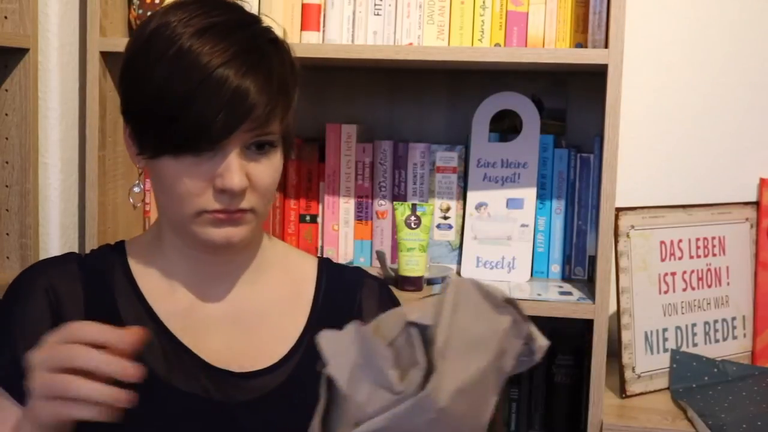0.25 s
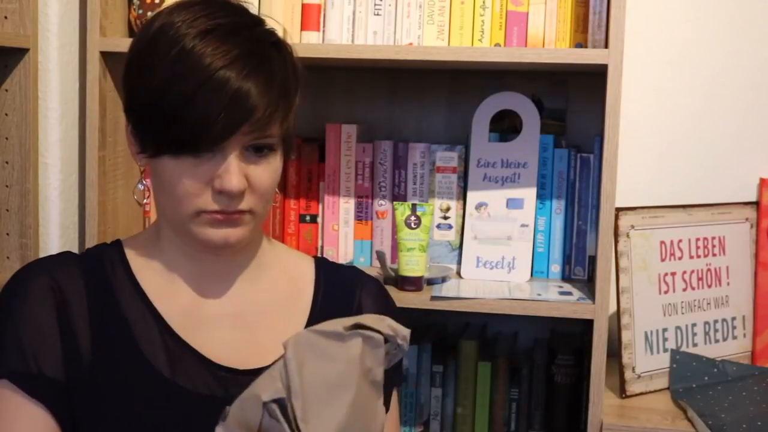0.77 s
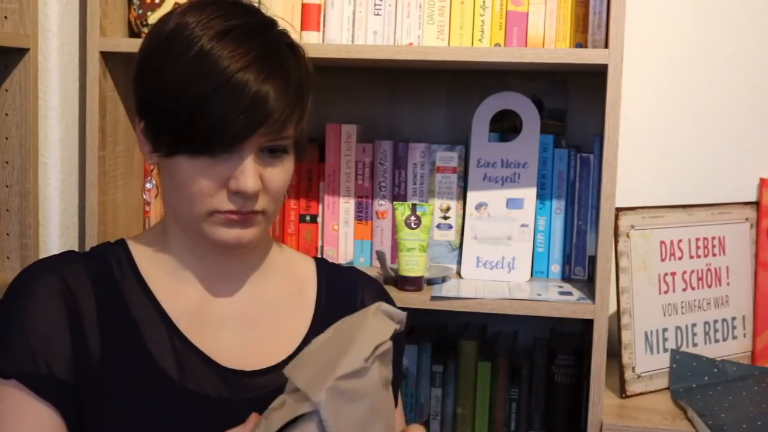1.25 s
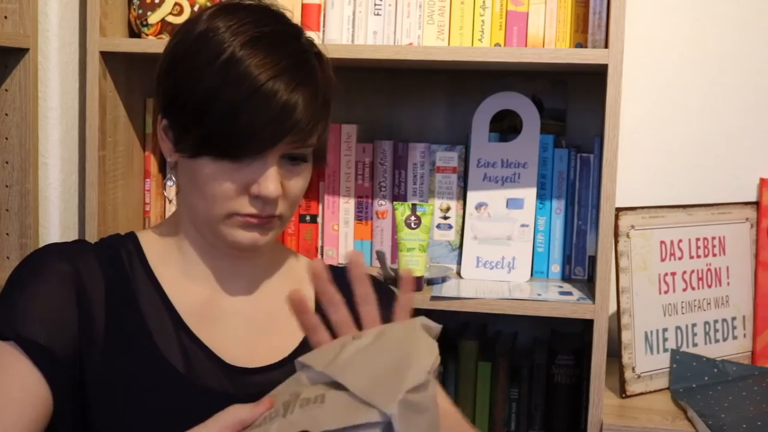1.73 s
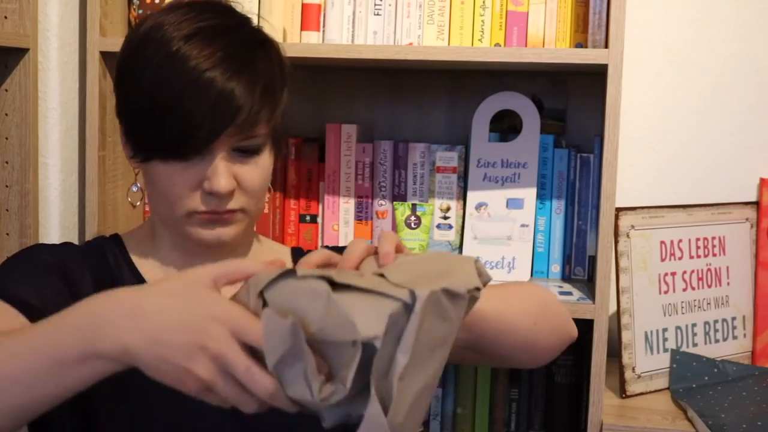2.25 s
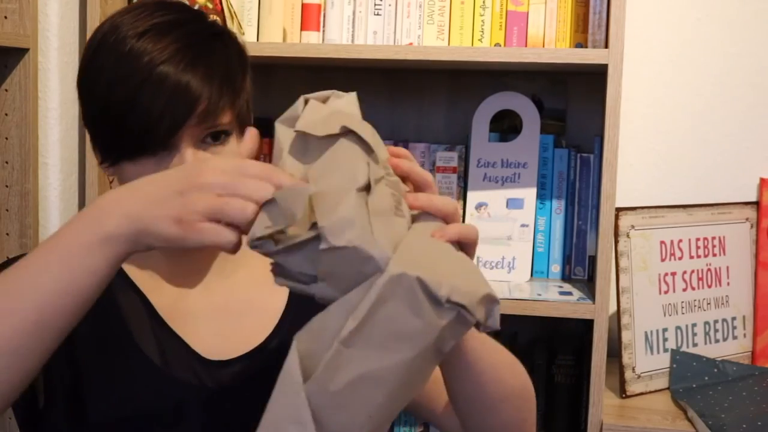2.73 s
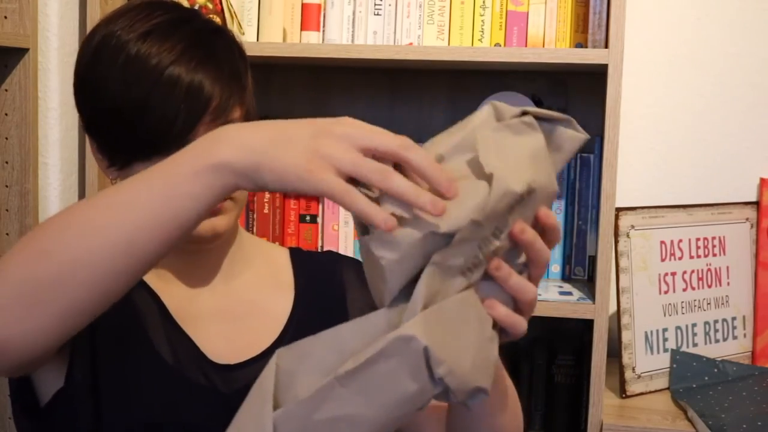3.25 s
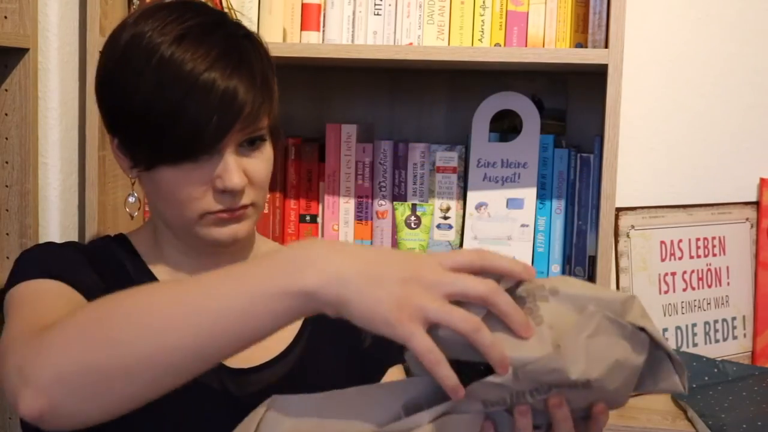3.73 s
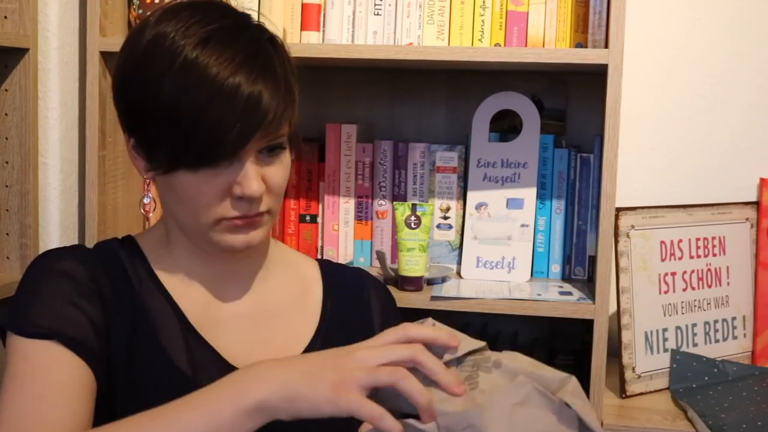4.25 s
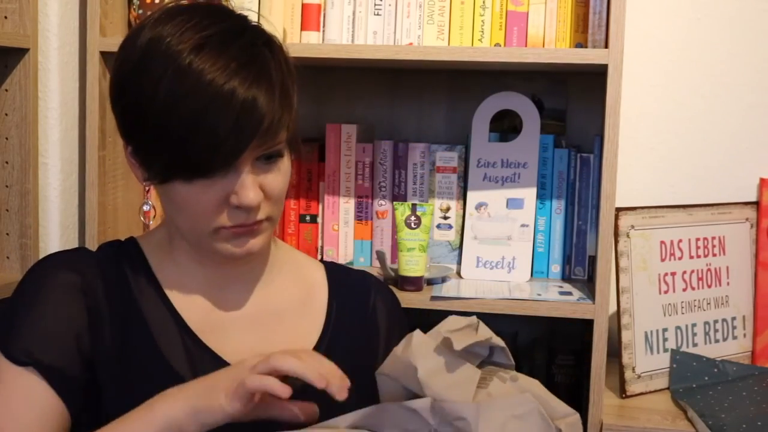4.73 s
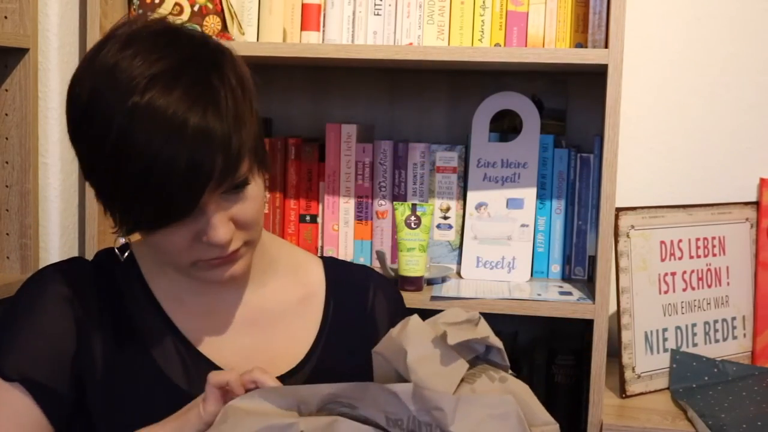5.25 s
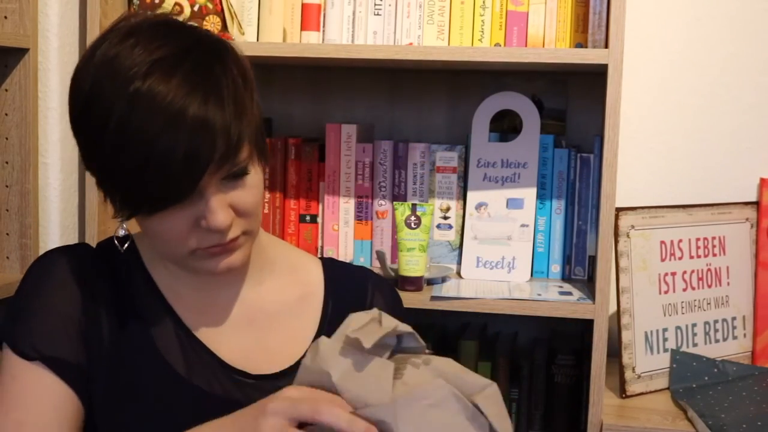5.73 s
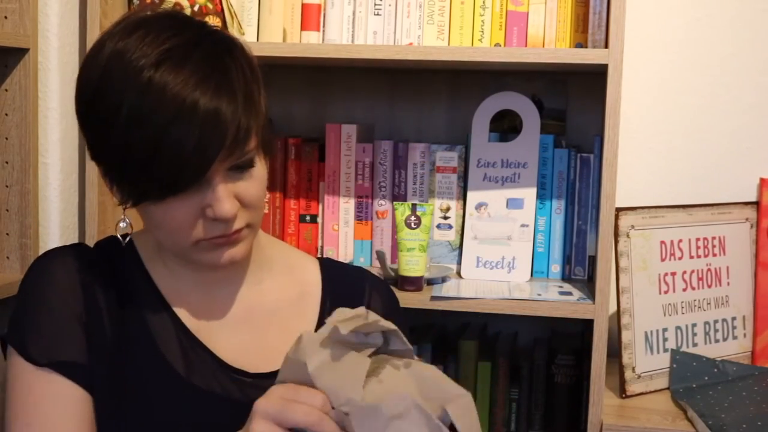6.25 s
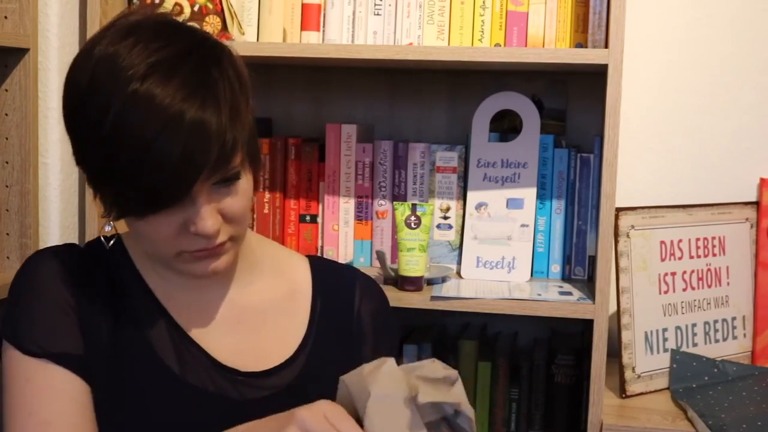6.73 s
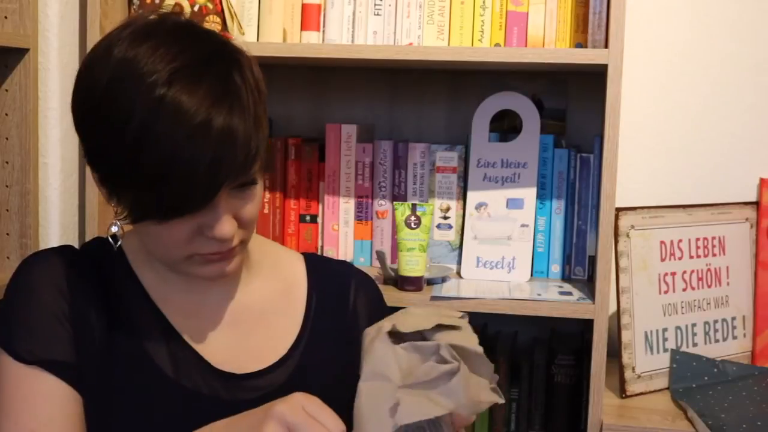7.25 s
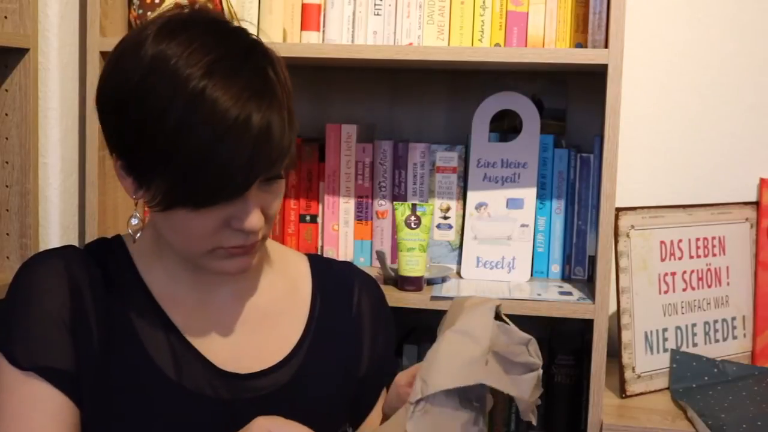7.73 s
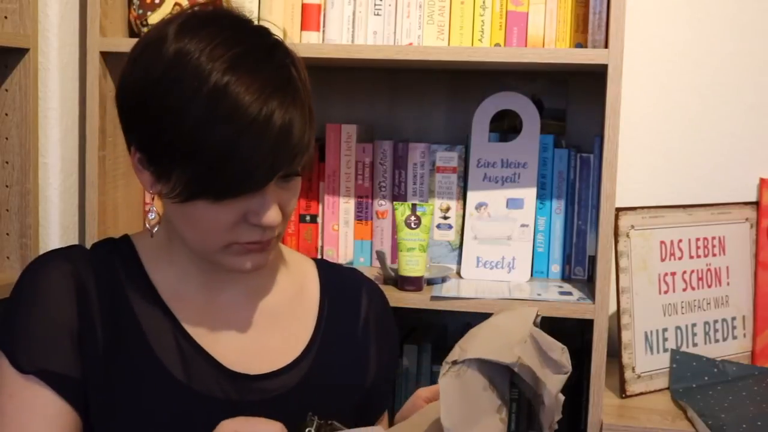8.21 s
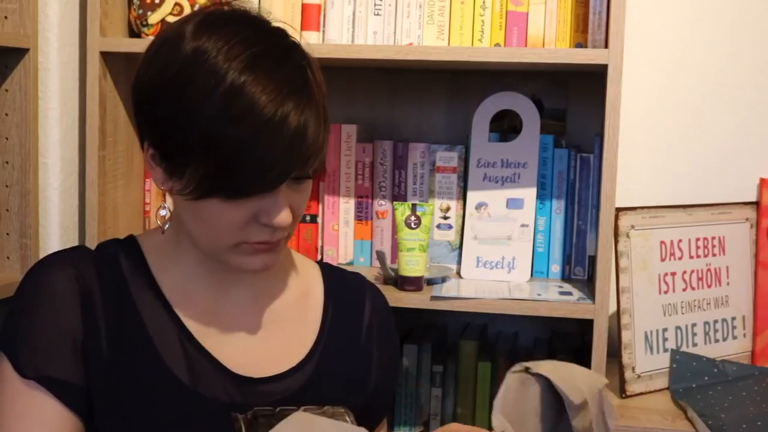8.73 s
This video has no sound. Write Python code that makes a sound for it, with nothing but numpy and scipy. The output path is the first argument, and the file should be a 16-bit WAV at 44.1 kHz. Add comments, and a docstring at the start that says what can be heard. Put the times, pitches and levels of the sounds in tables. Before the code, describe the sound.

Hands turn and unwrap a bundle of stiff packing paper close to a stereo microphone. A sharp crackle opens, then the paper rustles in short, uneven bursts with brief lulls between them. Creases snap one by one or in clusters, large folds give way with soft hollow knocks, and the sheets rub faintly. The small furnished room adds a short echo and a quiet hush.

```python
"""A small furnished room: hands turn and unwrap a bundle of stiff packing paper near a stereo microphone.
Thousands of small facets buckle as a rustle, creases snap over one by one, and the hollow wad knocks as
large folds give way. Narrow tones come from paper rubbing and from the lingering ring of the knocks.
A shelf close behind throws early echoes; the room adds a short tail and a quiet hush."""
import sys
import numpy as np
from scipy import signal
from scipy.fft import rfft, irfft
from scipy.io import wavfile

SR = 44100
rng = np.random.default_rng(int(sys.argv[2]) if len(sys.argv) > 2 else 0)


def wav_record(signal):
    """Record a signal, one row per channel, as 16-bit PCM in the file named by sys.argv[1]."""
    frames = np.transpose(np.atleast_2d(signal))
    bounded = np.clip(frames, -1, 1)
    # unit amplitude maps onto the largest positive 16-bit level
    quanta = np.round(bounded * 32767).astype(np.int16)
    wavfile.write(sys.argv[1], SR, quanta)


N = 395572


def from_db(db):
    """Decibels to gain."""
    return 10 ** (np.asarray(db) / 20)


def unit_rms(x):
    """Scale to rms 1."""
    return x / np.sqrt(np.mean(x ** 2) + 1e-20)


def unit_peak(x):
    """Scale to peak 1."""
    return x / np.abs(x).max()


def at_hz(curve, hz):
    """Interpolate a table over log frequency."""
    freqs_hz, values = np.array(curve).T
    return np.interp(np.log(hz), np.log(freqs_hz), values)


def drift(rate_hz):
    """Random knots joined by lines, spread 1."""
    knots = rng.standard_normal(4000)
    return np.interp(np.arange(N) * rate_hz / SR, np.arange(len(knots)), knots) * np.sqrt(3 / 2)


def butter(x, hz, kind, order=2):
    """Butterworth filter."""
    return signal.sosfilt(signal.butter(order, hz, kind, fs=SR, output="sos"), x)


def narrow(x, hz, width):
    """Band-pass within a factor 1 + width of hz."""
    return butter(x, [hz / (1 + width), min(hz * (1 + width), 0.45 * SR)], "band")


def ring(force, hz, t60_s):
    """One damped mode."""
    radius, angle = from_db(-60 / (t60_s * SR)), 2 * np.pi * hz / SR
    return signal.lfilter([0, np.sin(angle)], [1, -2 * radius * np.cos(angle), radius ** 2], force + 1e-18)


def facet(force, hz, cycles, width):
    """A paper facet rings for a few cycles in a band around its pitch."""
    return narrow(ring(force, hz, cycles / hz), hz, width)


def pan_gains(pan_db):
    """Left and right gains; positive is left."""
    return from_db([pan_db / 2, -pan_db / 2])


def placed(x, spot, pan_db, lag_per_spot_s=0.00007):
    """A source to one side is louder and earlier at the near microphone port."""
    lag = round(spot * lag_per_spot_s * SR)
    return pan_gains(pan_db)[:, None] * [np.roll(x, max(-lag, 0)), np.roll(x, max(lag, 0))]


# Hand squeezes: start_s, swell_s, hold_s, middle_db, large_re_middle_db, small_re_middle_db,
# lean_db_per_octave
SQUEEZES = [(-.1, 0.041, 0.04, -21.5, 1, -9, -4), (0.189, 0.0063, 0.028, -75, -10, 1, 4.5),
            (0.269, .01, 0.045, -79.5, 4, -16.5, -7), (0.37, 0.018, .04, -75.5, -3, -5, -5),
            (0.455, 0.027, 0.098, -41.5, -22, -3.5, 3.5), (0.552, 0.024, 0.13, -35, -15, -2, 1.5),
            (0.74, 0.0045, 0.011, -36, -12, 0.5, 1), (0.836, 0.0052, .02, -48, -34, -8, 4),
            (0.879, 0.013, 0.032, -37.5, -19, -8.5, 0.5), (0.946, 0.0047, 0.079, -34.5, -9.5, -13.5, -2.5),
            (1.095, 0.017, 0.051, -54, -13, 0.5, 3.5), (1.152, 0.042, 0.11, -43, -15, -3, 4),
            (1.234, 0.0091, 0.16, -35, -9.5, -11.5, -2), (1.416, .015, 0.053, -50, -6, -10, 5),
            (1.564, 0.12, 0.019, -47.5, -12.5, 1, 1), (1.738, 0.017, 0.071, -56.5, -9, -15, -1),
            (1.877, 0.023, 0.07, -54.5, -3.5, -5, 4), (2.029, 0.12, 0.016, -56, 2.5, -4, 1),
            (2.19, .006, .05, -58.5, -10, -3, 3), (2.255, 0.011, 0.043, -44.5, -44, -6.5, 6.5),
            (2.36, .006, 0.073, -62.5, -9, -6, -0.5), (2.441, 0.11, 0.032, -53, -6.5, -3, 2),
            (2.59, 0.0079, 0.062, -36, -14.5, -10, 3.5), (2.705, 0.019, 0.099, -52.5, -30, 1.5, 7.5),
            (2.859, 0.011, 0.027, -61, -25, 16, 6.5), (2.874, .006, 0.03, -53, -20.5, -1.5, 3),
            (2.954, 0.0074, 0.039, -60.5, -10.5, 6, 4.5), (3.04, .01, .07, -66.5, -4, -12, -2),
            (3.13, 0.005, 0.05, -57, 2, -12, -2), (3.188, .01, 0.095, -58, 0, -11, -4),
            (3.319, 0.0057, .03, -36.5, -13, -24, -9), (3.371, .01, .065, -53, -13, -10.5, -4),
            (3.452, 0.018, 0.11, -57.5, -2.5, -11, -3.5), (3.568, 0.11, 0.062, -51.5, -9.5, 2.5, 3.5),
            (3.76, .01, .045, -56, -4, -6, 0), (3.82, 0.006, 0.0098, -31, -16, -9, 0.5),
            (3.842, 0.0071, 0.04, -42, -12, -10, 2), (3.93, .03, .07, -66, -8, -5, 0.5),
            (4.034, 0.042, 0.092, -51, 1.5, -11, -5.5), (4.196, 0.006, 0.038, -36.5, -13, -10.5, 3),
            (4.339, 0.014, 0.14, -57, -1, -5.5, -3.5), (4.6, .11, .01, -67, -6, -4, -1.5),
            (4.716, 0.0064, 0.13, -43.5, -8, -6.5, 0.5), (4.855, 0.048, 0.076, -33.5, 0, -5.5, 0),
            (4.937, 0.0054, 0.072, -37, -4.5, -8.5, -1), (5.016, .015, 0.055, -37, -9, -8, -2.5),
            (5.107, .008, 0.032, -48.5, 2, -7.5, 2.5), (5.254, 0.092, 0.053, -59, -4, -0.5, 2),
            (5.46, 0.019, 0.037, -57.5, 2.5, -12, 1), (5.561, 0.09, 0.016, -42.5, -10, 0, 3),
            (5.657, 0.044, 0.11, -44, -6.5, 4, 3), (5.883, 0.011, 0.089, -48, -13.5, -4.5, 4.5),
            (6.096, 0.08, 0.11, -36.5, -7.5, -4.5, 3.5), (6.253, .006, 0.035, -35.5, -18, -6.5, 2),
            (6.371, 0.028, 0.12, -56.5, -10, -7, -4), (6.593, 0.0046, 0.03, -41.5, -17, -3, 10),
            (6.768, 0.051, 0.082, -55, -5.5, -4.5, -3), (6.957, 0.043, 0.016, -45, -11, -8.5, 1.5),
            (7.04, 0.016, 0.044, -37.5, -10, -11.5, 0.5), (7.283, 0.011, 0.03, -35, -19, -2.5, 1.5),
            (7.385, 0.0098, 0.44, -56.5, -8.5, -7, -3.5), (7.942, 0.054, 0.025, -50.5, -0.5, 11.5, -4),
            (8.068, 0.0091, 0.014, -60, 2, -12, 4.5), (8.17, .03, .11, -73, -6, -5, -0.5),
            (8.312, 0.017, 0.058, -61.5, -1.5, -20, -3), (8.391, 0.11, 0.041, -30.5, -10.5, -9.5, -0.5),
            (8.516, 0.025, 0.085, -37, -20, -16, -2.5), (8.627, 0.019, 0.083, -39.5, -12, -12.5, 4),
            (8.814, 0.042, .15, -33.5, -15, -4.5, 3.5)]

def squeezes(swell_db_per_decade=24, settle_db_per_s=254):
    """Squeezes swell, hold and settle; returns gain per facet size and power-weighted spectral lean."""
    t = np.arange(N) / SR
    coarse_t = t[::64]
    power, weighted_lean = 1e-20, 0
    for start_s, swell_s, hold_s, middle_db, large_db, small_db, lean in SQUEEZES:
        age_s, rise_s = coarse_t - start_s, max(swell_s, 0.005)
        swell_db = swell_db_per_decade * np.log10(np.maximum(age_s / rise_s, 1e-9))
        settle_db = settle_db_per_s * (rise_s + hold_s - age_s)
        envelope_db = np.clip(np.minimum(swell_db, settle_db), -200, 0)
        squeeze_power = from_db(middle_db + np.array([[0], [large_db], [small_db]]) + envelope_db) ** 2
        power += squeeze_power
        weighted_lean += lean * squeeze_power[0]
    gains = [np.interp(t, coarse_t, np.sqrt(row)) for row in power]
    return gains, np.interp(t, coarse_t, weighted_lean / power[0])


# Middle, large and small facets: low_hz, high_hz, base_buckles_per_s, ring_cycles, tilt_db_per_octave
FACET_SIZES = [(952, 4290, 7000, 10, 3.5), (135.4, 742, 700, 4.7, 11.5), (5150, 10650, 11000, 6, -6.5)]

def rustle(force_spread_db=3.0, clump_db=3.5, flicker_db=3.8, spread_db=2.5, wander_db=2.5, pitches=14):
    """Buckles come in clumps; each rings a facet at its own pitch and spot on the bundle."""
    out = np.zeros((2, N))
    clumping = from_db(clump_db * drift(rate_hz=60))
    gains, lean_db_per_octave = squeezes()
    for (low_hz, high_hz, buckles_per_s, cycles, tilt_db_per_octave), gain in zip(FACET_SIZES, gains):
        force = from_db(force_spread_db * np.minimum(rng.exponential(1, N), 3.6))
        force *= rng.choice([-1, 1], N)
        buckles = force * (rng.random(N) < buckles_per_s * clumping / SR)
        owner = rng.integers(0, pitches, N)
        spots = rng.standard_normal(pitches)
        layer = np.zeros((2, N))
        for k, hz in enumerate(np.geomspace(low_hz, high_hz, pitches)):
            level_db = tilt_db_per_octave * np.log2(hz / low_hz)
            level_db += lean_db_per_octave * np.log2(hz / np.sqrt(low_hz * high_hz))
            level_db += flicker_db * drift(rate_hz=16)
            ringing = unit_rms(facet(buckles * (owner == k), hz, cycles, width=0.31))
            layer += from_db(level_db) * placed(ringing, spots[k], spread_db * spots[k])
        out += gain * unit_rms(layer)
    return out * pan_gains(wander_db * drift(rate_hz=6.2))


# Background spectrum: freq_hz, relative_density_db
HUSH_SPECTRUM = [(18, -14), (30, 8.5), (114, 7.5), (369, 11), (1110, -7), (2070, 2), (2910, -2),
                 (10700, 0.5), (15500, -24.5)]

def hush(level_db=-77):
    """Steady noise of room and microphone."""
    hz = np.maximum(np.fft.rfftfreq(N, 1 / SR), 1)
    spectrum = rfft(rng.standard_normal((2, N))) * from_db(at_hz(HUSH_SPECTRUM, hz))
    return from_db(level_db) * unit_rms(irfft(spectrum, N))


# Creases snapping over: start_s, peak_db, pitch_hz, neighbours_re_ring_db, tick_re_ring_db, pan_db
CREASES = [(0.0513, -7.5, 4250, -10, -19, 4.5), (0.198, -51.5, 3680, -17, -5, 1),
           (0.421, -40, 1170, -3.5, -22, 3), (0.4643, -32, 2360, -9, -25, 3),
           (0.499, -29, 2100, -21, -23, 3.5), (0.5539, -24, 1830, -13, -3, -6.5),
           (0.581, -23, 3300, -6, -9, 5.5), (0.585, -30, 1630, 3, -4, -7),
           (0.742, -19.5, 1350, -1.5, -5, -0.5), (0.745, -23, 1420, 2, -16, 5),
           (0.8558, -34, 1360, -17, -18, 2.5), (0.8886, -29, 2020, -11, -26, -5),
           (0.8964, -22, 2900, -12, -25, 1.5), (0.919, -31, 2500, -2, -29, -5),
           (0.9607, -19, 1590, 1, -26, 3.5), (0.9678, -24, 1550, 3, -26, -2),
           (1.012, -19, 1050, -2.5, -30, -0.5), (1.128, -35, 2320, -19, -29, -1),
           (1.18, -35.5, 3550, -5, -14, 14), (1.2391, -25, 2750, -5, -25, 3),
           (1.265, -24, 2200, 1, -23, -7), (1.2905, -20, 2400, 7, -6.5, 3.5),
           (1.298, -18.5, 1940, 6, -10, 3), (1.34, -27, 2500, 0, -18, 2.5),
           (1.396, -30, 2980, -10, -27, -2), (1.5874, -29.5, 2840, -10, -39, -3),
           (1.6767, -22, 2940, -9, -32, -3), (1.697, -29, 4240, -10, -33, 0.5),
           (1.9098, -27.5, 1520, -6.5, -37, 2), (1.94, -38, 1620, -24, -24, -9.5),
           (2.0992, -29.5, 3300, -22, -46, 1.5), (2.191, -25.5, 3100, -11, -26, -4),
           (2.2633, -32.5, 2230, -24, -26, -1), (2.276, -27, 1620, -8, -5, -2),
           (2.2997, -23.5, 4300, -9, -12, 2), (2.36, -32, 3270, -8.5, -33, 0.5),
           (2.539, -35.5, 3390, -6, -5.5, 6), (2.551, -31.5, 2480, -17, -16, -3.5),
           (2.5975, -15.5, 2600, 0, -12, -1.5), (2.617, -11.5, 3570, 4.5, -8.5, 0.5),
           (2.645, -19, 2330, -1.5, -18, 1.5), (2.7282, -18.5, 2500, -4.5, -19, -3),
           (2.785, -19.5, 3760, -9, -8, 2), (2.885, -16.5, 3080, 4, -7, 2),
           (3.028, -33, 3160, -8.5, -18, 0), (3.133, -25.5, 1430, -8.5, -21.5, 2),
           (3.1919, -33.5, 2550, -29, -29, -4), (3.323, -9.5, 2250, -20.5, -44.5, -10.5),
           (3.3249, -13, 1785, -3, -28, 0.5), (3.617, -47.5, 3300, -21, 3, -9),
           (3.66, -27, 3200, -32, -16, -4.5), (3.762, -22, 3050, -27, -35, -2),
           (3.8302, -12, 2580, 7, -20, 2.5), (3.8242, -16, 2130, -4, -36, 5),
           (4.0759, -27, 2770, -2, -13, 2), (4.138, -30, 3100, -14, -15, -3),
           (4.172, -23, 3020, -12, -26, -2.5), (4.209, -17.5, 2080, -1.5, -14, 1.5),
           (4.351, -31, 2780, -33, -29, -6), (4.462, -46, 2320, -11, -21, -16),
           (4.721, -31, 2010, -15, -28, -12), (4.729, -16.5, 1560, -20, -32, 4.5),
           (4.748, -20, 1580, -4, -26, -3), (4.88, -28, 1720, -10.5, -20, 0.5),
           (4.8965, -18.5, 1520, 9, -8, 5), (4.9396, -9, 2640, -2.5, -20, 0.5),
           (4.9445, -17, 1960, 5, -20.5, 4.5), (4.975, -20, 2970, -10, -26, 6),
           (5.0361, -13.5, 1250, -0.5, -15, 1), (5.1297, -32, 2760, -10, -27, 1),
           (5.33, -38, 3230, 7, -17, 0), (5.4934, -28, 1300, -5, -38, 3), (5.62, -41, 3030, -23, -18, -2.5),
           (5.64, -25, 2850, 4, -23, -2), (5.651, -25.5, 3680, -9, -15, 0),
           (5.894, -22.5, 2780, -4.5, -24, -2), (5.897, -25, 2580, 1, -12, 0.5),
           (6.142, -18, 2760, -2.5, -12, -0.5), (6.2138, -14, 3360, -20, -18, 1.5),
           (6.2283, -12.5, 2460, 8.5, -22, 0.5), (6.2511, -9, 3020, 1.5, -22, -3),
           (6.2685, -8, 3170, 1, -15, -2), (6.277, -15.5, 2650, -4, -3.5, 1.5),
           (6.3984, -23, 3940, -34, -38, -1.5), (6.5268, -34.5, 1420, -3, -41, 2),
           (6.6014, -14, 2320, -2, -34, -0.5), (6.6418, -20.5, 2470, -20, -13, 0),
           (6.8434, -40.5, 3950, -35, -40, 2), (6.8667, -23, 2780, -40, -54, 1),
           (6.969, -42, 2960, -17.5, -23, -1.5), (7.0465, -26.5, 2400, -15, -40, -2.5),
           (7.0536, -15.5, 1740, -7, -47, 0), (7.0569, -18.5, 2200, -15, -40, 0.5),
           (7.0658, -19, 1480, -2, -40, -1.5), (7.1129, -10.5, 3530, -4.5, -16.5, 1.5),
           (7.2885, -19.5, 2270, -6, -23, -5.5), (7.4844, -23.5, 2930, -44.5, -39, -3.5),
           (7.667, -28.5, 1410, -5, -21, 3), (7.6848, -11, 3150, -4, -53, -2),
           (7.753, -30, 2600, -6, -25, 3.5), (7.783, -23.5, 2300, -3.5, -34, 2),
           (7.897, -38.5, 2570, -11, -36, -2.5), (7.9402, -27, 2660, -3, -32, 3.5),
           (7.97, -22, 3320, -11, -34, -2.5), (7.9877, -8, 2960, -2.5, -12.5, -0.5),
           (8.0833, -21.5, 3900, -19, -26, 1), (8.0895, -24.5, 3780, -15, -22, 2),
           (8.1203, -23, 3190, -5.5, -37, 2), (8.319, -41, 2600, -2, -26, 3),
           (8.382, -54, 2650, -17, -23, -1), (8.4465, -20, 1420, -10, -34, 1.5),
           (8.455, -21.5, 1360, -7, -34, 0), (8.4797, -16.5, 3080, -13, -30, 1.5),
           (8.4911, -12, 2520, -1, -23, 3.5), (8.6805, -12.5, 3500, -6.5, -36, 1.5),
           (8.7928, -26, 3650, -21, -34, -1.5), (8.8346, -14.5, 3070, -39, -35, -1),
           (8.855, -14, 2100, 0.5, -16, -3.5)]

def crease_snaps(cycles=7.5, width=0.55, tear_s=0.0011, gentle_below_db=-17, size=2600):
    """A crease gives way in a few slips; each rings it and its neighbours, and tearing fibres tick."""
    out, click = np.zeros((2, N + size)), signal.unit_impulse(size)
    tear_age = np.arange(size) / SR / tear_s
    draws = rng.standard_normal((len(CREASES), 16))
    for (start_s, peak_db, pitch_hz, neighbours_db, tick_db, pan_db), draw in zip(CREASES, draws):
        detunes, slip_signs, slip_times = np.split(draw, [4, 10])
        tearing = tear_age * np.exp(-tear_age) * rng.standard_normal(size)
        tick = from_db(tick_db) * unit_peak(butter(tearing, [5000, 8800], "band", order=3))
        ringing = facet(click, pitch_hz, cycles, width)
        for ratio, detune in zip((0.63, 1.35, 1.8, 2.4), detunes):
            neighbour_hz = pitch_hz * ratio * (1 + 0.08 * detune)
            size_db = -7.5 if ratio < 1 else -2 * np.log2(ratio)
            ringing += from_db(neighbours_db + size_db) * facet(click, neighbour_hz, cycles, width)
        # Gentle creases roll over in longer, more even slips.
        gentleness = np.clip((gentle_below_db - peak_db) / 12, 0, 1)
        delays_s = np.abs(slip_times) * (0.0012 + 0.003 * gentleness)
        slips = np.bincount((delays_s * SR).astype(int), np.sign(slip_signs)) * (0.25 + 0.3 * gentleness)
        slips[0] = 1
        snap = unit_peak(np.convolve(ringing + tick, slips)[:size])
        at = round(start_s * SR)
        out[:, at:at + size] += from_db(peak_db) * placed(snap, spot=0.52 * pan_db, pan_db=pan_db)
    return out[:, :N]


# Modes of the hollow wad: pitch_ratio, gain_db, t60_ratio
WAD_MODES = [(0.581, -15.5, 0.37), (0.778, -7.5, 0.89), (1.008, 7.5, 0.57), (1.3, -3, .4),
             (1.7, -5.5, 0.27)]
# Large folds giving way: start_s, peak_db, pitch_hz, t60_s
FOLDS = [(0.275, -60, 440, 0.064), (0.484, -44, 510, 0.035), (0.621, -33.5, 357, 0.013),
         (0.901, -47, 540, 0.071), (0.957, -35.5, 433, 0.11), (1.176, -54, 630, 0.054),
         (1.235, -36, 660, 0.097), (1.289, -44, 624, 0.076), (1.752, -44, 592, 0.12),
         (1.909, -43, 730, 0.046), (2.192, -33, 580, 0.041), (2.262, -37, 600, 0.042),
         (2.36, -39.5, 362, 0.017), (2.598, -39, 584, 0.058), (2.727, -31, 566, 0.016),
         (2.795, -34.5, 570, 0.017), (3.027, -51, 500, 0.042), (3.133, -54, 790, 0.11),
         (3.328, -27.5, 526, 0.06), (3.671, -39.5, 404, 0.098), (3.763, -36.5, 510, 0.096),
         (3.824, -34.5, 694, 0.076), (4.171, -43, 620, 0.047), (4.208, -39.5, 550, 0.041),
         (4.724, -58, 724, 0.06), (4.829, -39, 438, 0.088), (4.868, -33, 600, 0.1),
         (4.939, -20.5, 760, 0.022), (5.371, -38.5, 415, 0.04), (5.492, -34.5, 554, 0.055),
         (5.654, -39, 470, 0.19), (5.727, -56, 536, 0.065), (5.914, -42, 437, 0.03),
         (6.156, -31.5, 457, 0.025), (6.253, -28.5, 492, 0.099), (6.604, -37.5, 786, 0.066),
         (6.641, -29, 775, 0.014), (7.063, -48, 620, 0.06), (7.118, -27.5, 467, 0.048),
         (7.315, -39.5, 592, 0.06), (7.373, -29.5, 498, 0.073), (8.447, -50, 790, 0.06),
         (8.477, -36, 630, 0.16), (8.68, -21.5, 650, 0.042), (8.841, -29, 612, 0.083)]

def wad_knocks(push_s=0.0004, shudder_s=0.015, shudder_db=4, size=4000):
    """A fold's push and an uneven shudder ring the hollow; pitch depends on how the wad is held."""
    out, t = np.zeros(N + size), np.arange(size) / SR
    push = t * np.exp(-t / push_s)
    for start_s, peak_db, pitch_hz, t60_s in FOLDS:
        shudder = from_db(shudder_db) * push.max() * rng.standard_normal(size) * np.exp(-t / shudder_s)
        hollow = sum(from_db(gain_db) * ring(push + shudder, pitch_ratio * pitch_hz, t60_ratio * t60_s)
                     for pitch_ratio, gain_db, t60_ratio in WAD_MODES)
        radiated = butter(hollow, 0.73 * pitch_hz, "high")   # little radiates below the pitch
        at = round(start_s * SR)
        out[at:at + size] += from_db(peak_db) * unit_peak(radiated)
    return out[:N]


# Narrow ringing tones: start_s, length_s, level_db, pitch_hz
RINGING_TONES = [(1.655, 0.052, -55, 1200), (1.755, 0.053, -51, 584), (1.79, .04, -63, 2900),
                 (1.84, 0.078, -57.5, 3800), (1.915, 0.07, -51, 1460), (1.97, 0.062, -55.5, 610),
                 (2.11, .05, -58, 3400), (2.2, .05, -57.5, 2700), (2.2, 0.035, -58, 633),
                 (2.27, 0.055, -57, 580), (2.275, 0.034, -45, 1710), (2.49, 0.062, -61.5, 3100),
                 (2.89, 0.017, -46.5, 1290), (2.89, 0.058, -45.5, 2700), (3.615, 0.18, -50, 3190),
                 (3.645, 0.087, -60, 3960), (3.68, 0.13, -51, 1630), (3.7, 0.058, -58, 7400),
                 (3.77, 0.028, -51, 3140), (4.065, 0.13, -48.5, 1400), (4.125, 0.076, -48, 3130),
                 (4.25, 0.086, -48, 1650), (4.355, 0.037, -48, 3100), (4.37, 0.036, -46.5, 1520),
                 (4.435, 0.035, -62, 3350), (4.465, 0.027, -65, 2350), (4.475, 0.05, -63, 492),
                 (5.129, 0.077, -47, 2800), (5.345, 0.014, -50.5, 2920), (5.62, 0.03, -42, 2960),
                 (5.7, 0.052, -42.5, 540), (5.77, 0.018, -46, 2580), (5.78, 0.034, -44, 1490),
                 (5.92, 0.072, -47.5, 4640), (6.14, 0.028, -38, 2740), (6.28, 0.061, -39, 1540),
                 (6.82, .06, -53.5, 4100), (6.87, 0.032, -69, 2630), (6.98, 0.033, -55.5, 563),
                 (7.06, 0.058, -38.5, 1460), (7.46, 0.62, -59, 1480), (7.487, 0.062, -51, 2830),
                 (7.487, 0.042, -48, 4900), (7.555, 0.22, -57, 3430), (7.58, 0.09, -59, 4500),
                 (7.6, 0.085, -58, 5760), (7.72, .08, -48, 1520), (8.09, 0.047, -48.5, 3870),
                 (8.125, 0.03, -51, 1060), (8.381, 0.067, -52.5, 1490), (8.37, 0.14, -44.5, 2600),
                 (8.7, 0.086, -42, 647)]

def ringing_tones(pulses_per_s=900, fade_db=5.5, edge_s=0.0031, spread_db=2.6, size=12000):
    """Paper rubbing, and the lingering ring of hollow knocks: random pulses ring a narrow band."""
    out, t = np.zeros((2, N + size)), np.arange(size) / SR
    for start_s, length_s, level_db, pitch_hz in RINGING_TONES:
        fires = rng.random(size) < pulses_per_s / SR
        pulses = fires * rng.standard_normal(size)
        tone = unit_rms(narrow(pulses + 1e-18, pitch_hz, width=0.077))
        gate = np.clip(np.minimum(t, length_s + edge_s - t) / edge_s, 0, 1)
        envelope = gate * from_db(level_db - fade_db * t / length_s)
        spot = rng.standard_normal()
        at = round(start_s * SR)
        out[:, at:at + size] += placed(envelope * tone, spot, spread_db * spot)
    return out[:, :N]


# Echoes off shelf and body: delay_s, gain_db
EARLY_ECHOES = [(.0028, -21), (.0055, -33), (.0085, -26.5), (.0125, -19.5)]
# Room tail decay: freq_hz, t60_s
ROOM_DECAY = [(200, 0.15), (530, 0.23), (1390, 0.28), (3680, 0.16), (9700, 0.11)]
# Room tail left-right likeness: freq_hz, correlation
ROOM_CORRELATION = [(100, 0.74), (300, 0.96), (700, 0.69), (1500, 0.34), (3000, 0.21), (8000, 0.16)]

def room_response(length_s=0.49, tail_db=-2, build_s=0.00079):
    """Direct path, early echoes from alternate sides, and a tail that dies band by band."""
    size = int(length_s * SR)
    t, tail = np.arange(size) / SR, np.zeros((2, size))
    edges_hz = 60 * 2 ** np.arange(0, 8.6, 0.5)
    for low_hz, high_hz in zip(edges_hz, edges_hz[1:]):
        hz = np.sqrt(low_hz * high_hz)
        mid, side = butter(rng.standard_normal((2, size)), [low_hz, high_hz], "band")
        correlation = at_hz(ROOM_CORRELATION, hz)
        band = np.sqrt(1 + correlation) * mid + np.sqrt(1 - correlation) * side * [[1], [-1]]
        tail += from_db(-60 * t / at_hz(ROOM_DECAY, hz)) * band
    tail *= 1 - np.exp(-t / build_s)
    out = from_db(tail_db) * tail / np.sqrt(np.sum(tail ** 2) / 2)
    out[:, 0] += 1
    for k, (delay_s, gain_db) in enumerate(EARLY_ECHOES):
        near_port, at = k % 2, round(delay_s * SR)
        out[near_port, at] += from_db(gain_db)
        out[1 - near_port, at + 5] += from_db(gain_db)
    return out


def scene(places=3, move_s=0.804):
    """The bundle drifts round a few places, each with its own room response, over the hush."""
    paper = rustle() + ringing_tones() + crease_snaps() + wad_knocks()
    position = np.arange(N) / SR / move_s % places
    out = np.zeros((2, N))
    for place in range(places):
        distance = np.minimum(abs(position - place), places - abs(position - place))
        crossfade = np.cos(np.pi / 2 * np.minimum(distance, 1))
        out += signal.fftconvolve(crossfade * paper, room_response(), axes=1)[:, :N]
    return out + hush()


# Microphone port imbalance: freq_hz, left_re_right_db
PORT_BALANCE = [(200, 0.5), (800, 0.9), (2500, -2.5), (5000, -0.5), (9000, 1.5), (14000, 5)]

def record(dry, bass_cut_hz=87, stopband_hz=16615.5):
    """Stereo microphone: ports of unequal colour, thin bass, top cut off."""
    hz = np.maximum(np.fft.rfftfreq(N, 1 / SR), 1)
    coloured = irfft(rfft(dry) * pan_gains(at_hz(PORT_BALANCE, hz)), N)
    thinned = butter(coloured, bass_cut_hz, "high")
    return signal.sosfilt(signal.cheby2(12, 70, stopband_hz, fs=SR, output="sos"), thinned)


dry = scene()
out = record(dry)
wav_record(out)
```